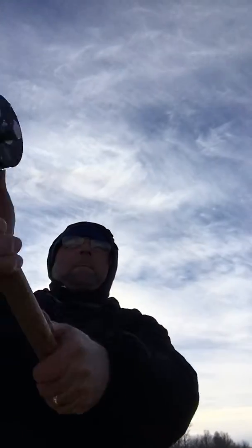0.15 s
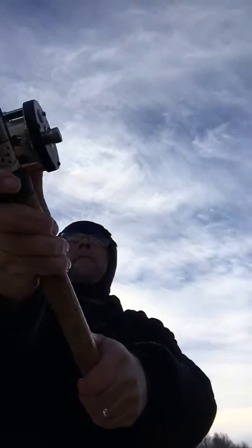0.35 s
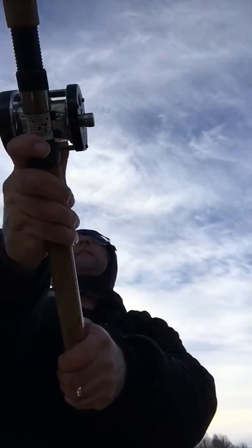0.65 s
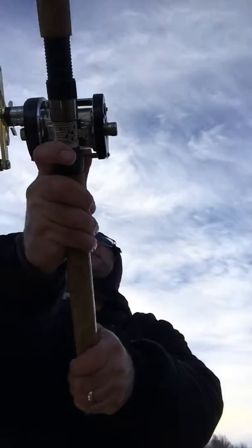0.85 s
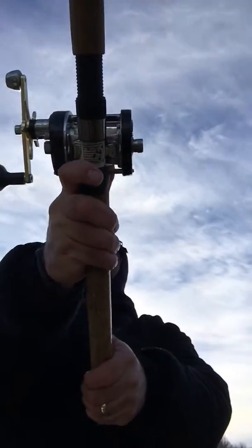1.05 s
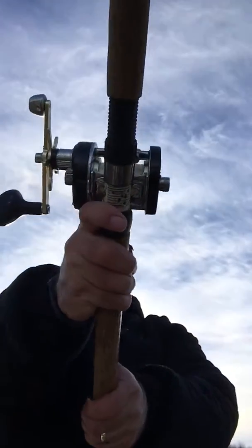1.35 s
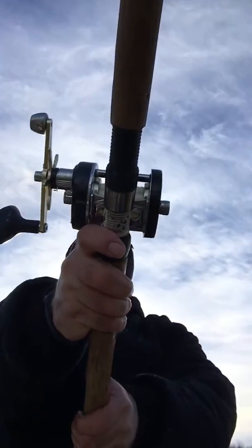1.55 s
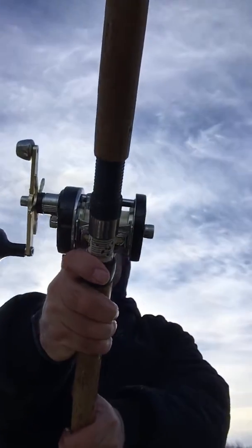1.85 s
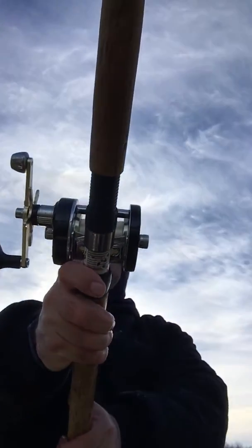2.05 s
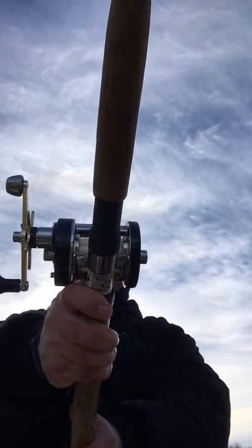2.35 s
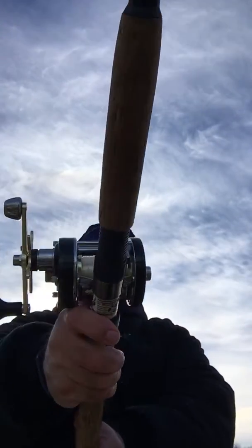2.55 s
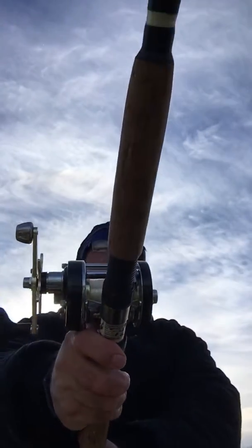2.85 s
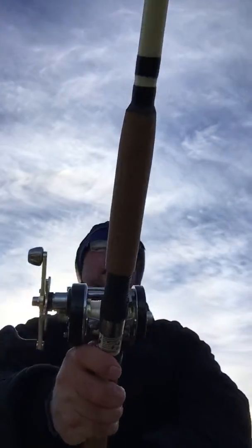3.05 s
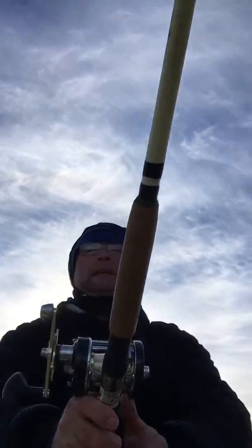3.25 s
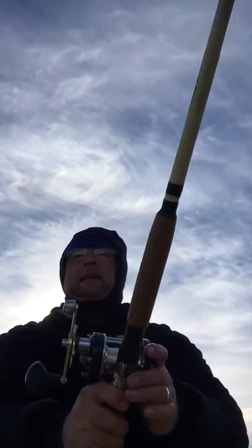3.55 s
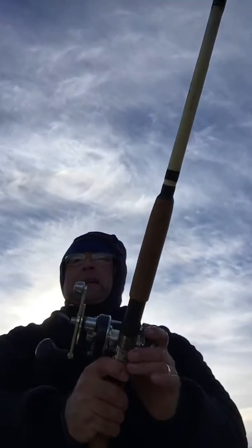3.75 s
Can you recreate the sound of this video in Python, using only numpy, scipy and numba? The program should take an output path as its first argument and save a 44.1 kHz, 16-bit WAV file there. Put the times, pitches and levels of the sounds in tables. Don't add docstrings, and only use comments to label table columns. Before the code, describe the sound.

A casting reel's spinning spool gives a falling metallic whirr until a thumb brakes it dead.

```python
import sys
import numpy as np
from scipy import signal
from scipy.io import wavfile
from scipy.ndimage import uniform_filter1d
from numba import njit

SR = 44100
rng = np.random.default_rng(int(sys.argv[2]) if len(sys.argv) > 2 else 0)


def gain_from_db(level_db):
    decades = np.asarray(level_db, float) / 20
    return 10 ** decades


def digitize_waveform(pressure):
    field = np.atleast_2d(pressure).T
    bounded = np.clip(field, -1, 1)
    quanta = np.round(bounded * 32767).astype(np.int16)
    wavfile.write(sys.argv[1], SR, quanta)


N = 171990
T = np.arange(N) / SR

# time_s, turning_rate_per_s
SPOOL_SPEED = [(0, 112), (.05, 134), (.1, 150), (.225, 125.5), (.31, 138.5), (.42, 119.5), (.485, 126.5),
               (.61, 114), (.655, 117.5), (.71, 114), (.9, 107), (1.05, 94.6), (1.2, 84), (1.45, 71.5),
               (1.7, 62.3), (1.87, 60.2), (2.05, 55.3), (2.6, 45)]
# time_s, level_db, plate_ring_hz, open_side_facing_db
REEL_AS_HEARD = [(0.0, -44, 4250, -34), (0.04, -41, 4350, -18), (0.07, -37, 4330, -12),
                 (0.22, -36, 4180, -15.5), (0.75, -40.5, 4187, -15.5), (1.08, -42, 4230, -13.5),
                 (1.24, -42.5, 4360, -17), (1.61, -44, 4400, -30), (2.03, -46, 4400, -17),
                 (2.04, -44.5, 4370, -31), (2.51, -47.5, 4430, -32), (2.54, -47, 4490, -13),
                 (2.57, -47, 4280, -17), (2.65, -84, 4120, -17), (2.68, -67, 4230, -24),
                 (2.7, -75, 4000, -23)]
# multiple_of_turning_rate, level_db
ORDER_TONES = [(6, -20), (7, -21), (13, -13.5), (14, -21), (15, -23), (16, -16), (17, -18), (19, -21),
               (21, -22), (24, -19), (26, -16), (27, -20), (30, -22), (32, -24), (35, -21), (37, -21),
               (38, -23), (39, -21), (40, -23), (42, -22), (43, -20)]
BALL_TONES_DB = [-19, -11, -20, -19]
# multiple_of_turning_rate, level_db, centre_s, half_length_s
CHATTER = [
    (34, -5.5, .285, .14),
    (34, -11, .49, .065),
    (33, -13, .21, .05),
    (31, -9, .315, .045),
    (38, -11, .42, .05),
    (38, -11, .65, .05),
    (29, -13, .11, .04),
    (35, -12, .39, .04),
]
# pitch_hz, width_hz, level_db, slope_db_per_octave_of_speed
FRAME_MODES = [(1255, 450, 2.6, -2), (1710, 374, -2, 1.5), (2117, 434, -1, 3), (2647, 216, -3.5, -3.5),
               (3176, 102, 1, -1.5), (5190, 240, -25, 21.5), (6064, 114, -6.5, 1.5), (7070, 160, -11.5, 8),
               (9200, 770, -21.5, 6), (12300, 700, -31, 0), (8100, 110, -20, 2), (11200, 1100, -25.5, 3)]
# start_s, peak_db
SNAGS = [(0.0498, -50), (0.0922, -41), (0.404, -42), (0.6979, -42), (0.844, -45), (0.8645, -41),
         (0.9458, -52), (1.063, -58), (1.1448, -54), (1.1927, -45), (1.2451, -53), (1.3324, -46),
         (1.3983, -43), (1.4836, -52), (1.5544, -56), (1.5784, -59), (1.6088, -70), (1.8014, -57),
         (1.8532, -43), (1.9804, -66), (2.0757, -60), (2.1531, -59), (2.3511, -47), (2.4249, -59),
         (2.533, -59), (2.5935, -48)]
# centre_s, pitch_hz, length_s, glide_octaves
KNOCKS = [(.03, 1270, .035, 0), (.255, 1290, .03, -.1), (.25, 255, .05, 0), (.363, 375, .03, -.1),
          (.387, 335, .04, 0), (.42, 400, .04, .1), (.4825, 155, .045, -.4), (.4825, 310, .045, -.4),
          (.52, 600, .035, 0), (.535, 880, .05, 0), (1.12, 95, .05, 0), (2.598, 320, .02, -.2),
          (2.6, 680, .02, 0), (2.63, 280, .03, 0), (2.65, 130, .04, 0), (2.678, 650, .018, 0),
          (2.7, 330, .03, 0), (2.718, 220, .04, -.1), (2.716, 900, .01, 0), (2.84, 200, .13, .9),
          (2.912, 800, .008, 0), (2.936, 1050, .012, 0), (3.16, 1050, .02, 0), (3.295, 550, .022, 0),
          (3.335, 350, .02, 0), (3.345, 180, .03, 0), (3.35, 1000, .012, 0), (3.39, 330, .03, 0),
          (2.73, 105, .12, 0), (3.11, 215, .05, 0)]
KNOCK_LEVELS_DB = [-42.5, -45, -54.5, -49, -47, -53, -47.5, -51, -51, -53, -63.5, -46, -50, -60, -60, -56,
                   -55, -46, -55, -68, -60, -62, -62, -58, -62, -62, -59, -62, -64, -65]
RUSTLE_TIMES_S = [.02, .5, 2.62, 2.71, 2.94, 3.05, 3.2, 3.34, 3.44, 3.58, 3.78]
# level_db, length_s
RUSTLE_SWELLS = [(-52, 0.047), (-53.5, 0.3), (-59.5, 0.063), (-73, 0.15), (-69.5, 0.15), (-67.5, 0.12),
                 (-69, 0.18), (-67, 0.11), (-66.5, 0.18), (-72, 0.15), (-70.5, 0.29)]
# pitch_hz, level_db_per_hz
CLOTH_SPECTRUM = [(150, -32), (250, -9), (357, -1), (434, -10.5), (640, -16), (1110, -9.5), (2190, -10.5),
                  (12000, -36.5), (15600, -60), (22000, -120)]
# pitch_hz, level_db
AIR_SPECTRUM = [(71, 0), (120, 1.5), (183, -8.5), (384, -3.5), (469, 3), (807, -5), (967, -2), (2030, -8),
                (14500, -29)]
# start_s, level_db
GUST_TICKS = [
    (3.768, -62),
    (3.785, -72),
    (3.842, -60),
]
# centre_s, pitch_hz, width_hz, level_db, length_s
SQUEAKS = [
    (2.54, 6500, 3000, -64, .03),
    (2.555, 12100, 250, -75, .02),
    (2.63, 8700, 400, -78, .05),
    (2.63, 6500, 1200, -76, .06),
]
# start_s, level_db
TAPS = [(2.594, -42), (2.6, -42), (2.607, -44), (2.672, -48), (2.683, -43), (2.714, -41.5), (2.722, -52),
        (2.909, -52), (2.936, -53), (2.956, -57), (3.18, -68), (3.333, -58), (3.349, -56), (3.392, -67),
        (3.498, -69)]

SPEED_JITTER, WOBBLE, FLUTTER_DB = .004, 0.22, 0.59
GRAINS_PER_S, GRAIN_SPREAD_DB = 11000, 3.5
BALLS_PER_TURN, TONES_DB, TONE_WANDER_DB, FINE_ORDERS_DB = 5.44, -5, 3.5, -24
TONE_CUT_HZ = 950
BALLS_LOADED_S, BALL_SURGE_S, BALL_SURGE_LEN_S, BALL_SURGE_DB = .36, .43, .06, 6
REBOUND_S, REBOUND_LEN_S, IMBALANCE_DB, STOP_S = .31, .17, -33, 2.66
PLATE_WIDTH_HZ, PLATE_DB, PLATE_DB_PER_OCTAVE = 230, 3.5, -3.5
BETWEEN_HZ, BETWEEN_DB, BETWEEN_DB_PER_OCTAVE = 3450, -9.5, -4.5
ABOVE_DB, ABOVE_DB_PER_OCTAVE = -17.5, 3
SPRAY_DB, SPRAY_HZ, SPRAY_DB_PER_OCTAVE = -33.5, 10000, 6
LOW_CUT_HZ, UNDERTONE_DB, UNDERTONE_DB_PER_OCTAVE = 1088, -23.5, 4
GRIP_HZ, GRIP_WIDTH_HZ, GRIP_DB = 336, 150, -26
THUMB_S, THUMB_LEN_S, THUMB_DB = 2.44, 0.42, 20
AIR_DB, AIR_TOP_HZ = -70.5, 14900
WIND_DB, WIND_HZ = -73.5, 91
GUST_S, GUST_DB, GUST_HZ, FIZZ_DB, FIZZ_HZ = 3.765, -64, 150, -79, 10800
SCUFF_DB, SCUFF_HZ = -13, 1290
SNAG_LOSS_DB, SNAG_S = -6, .0012
TAP_HZ, TAP_WIDTH_HZ = 800, 620
PORT_DIP_HZ, PORT_DIP_WIDTH_HZ, PORT_DIP = 10560, 1700, 0.37


def rms_one(x):
    return x / np.sqrt(np.mean(x ** 2) + 1e-20)


def in_time(rows):
    s, *columns = np.transpose(rows)
    return [np.interp(T, s, c) for c in columns]


def drift(rate_hz):
    r = np.exp(-80 * np.pi * rate_hz / SR)
    noise = rng.standard_normal(N // 40 + 2002)
    slow = signal.lfilter([1], [1, -2 * r, r * r], noise)[2000:]
    return np.interp(np.arange(N) / 40, np.arange(len(slow)), rms_one(slow))


def cut(x, hz, kind, order=2):
    return signal.sosfilt(signal.butter(order, hz, kind, fs=SR, output="sos"), x)


def bell(centre_s, length_s):
    return np.exp(-4 * ((T - centre_s) / length_s) ** 2)


def plateau(centre_s, half_s):
    return np.exp(-((T - centre_s) / half_s) ** 4)


@njit
def resonance(x, hz, width_hz):
    y, r = np.zeros(len(x)), np.exp(-np.pi * width_hz / SR)
    for i in range(2, len(x)):
        drive = (1 - r * r) / 2 * (x[i] - x[i - 2])
        y[i] = drive + 2 * r * np.cos(2 * np.pi * hz[i] / SR) * y[i - 1] - r * r * y[i - 2]
    return y


def steady_resonance(x, hz, width_hz):
    return resonance(x, np.full(N, float(hz)), float(width_hz))


def twice(x, hz, width_hz):
    wide = 1.5 * width_hz
    return resonance(resonance(x, hz, wide), hz, wide)


def grains(per_s, spread_db):
    size = gain_from_db(spread_db * np.minimum(rng.exponential(1, N), 4.2)) * rng.choice([-1, 1], N)
    return rms_one(size * (rng.random(N) < per_s / SR))


def banded(source, spectrum, patchy_db):
    out, edges = 0, 22 * 2 ** np.arange(0, 9.9, .5)
    hz, db = np.transpose(spectrum)
    for k, (low, high) in enumerate(zip(edges, edges[1:])):
        level_db = np.interp(np.log(low * high) / 2, np.log(hz), db)
        band = cut(np.roll(source, 5000 * k), [low, high], "band")
        out = out + gain_from_db(level_db + patchy_db * drift(10)) * band
    return rms_one(out)


def spool_whine(angle):
    tones = ORDER_TONES + [(BALLS_PER_TURN * k, db) for k, db in enumerate(BALL_TONES_DB, 1)]
    tones += [(k, FINE_ORDERS_DB + 2 * rng.standard_normal()) for k in range(45, 95, 2)]
    wander = [gain_from_db(TONE_WANDER_DB * drift(22)) for _ in range(6)]
    loaded = np.clip(1 + 40 * (T - BALLS_LOADED_S - .02), .3, 1)
    loaded = loaded * gain_from_db(BALL_SURGE_DB * plateau(BALL_SURGE_S, BALL_SURGE_LEN_S))
    whine = np.zeros(N)
    for order, db, s, half in CHATTER:
        whine += gain_from_db(db) * plateau(s, half) * np.cos(order * angle)
    for k, (order, db) in enumerate(tones):
        load = loaded if order % 1 else 1
        level = gain_from_db(db + TONES_DB) * load * np.roll(wander[k % 6], 9000 * k)
        whine += level * np.cos(order * angle + rng.uniform(0, 6.7))
    return cut(whine, TONE_CUT_HZ, "high", order=6)


def frame_ring(rub, hiss, whine, octaves, plate_hz, facing_db):
    drive = rub + whine
    plate_db = PLATE_DB + PLATE_DB_PER_OCTAVE * octaves + 0.7 * drift(6)
    body = gain_from_db(plate_db) * twice(drive, plate_hz, PLATE_WIDTH_HZ)
    between = cut(hiss, BETWEEN_HZ, "low", order=6) + cut(whine, 1.27 * BETWEEN_HZ, "low")
    body += gain_from_db(BETWEEN_DB + BETWEEN_DB_PER_OCTAVE * octaves) * between
    above = cut(hiss, [4000, 7500], "band", order=3)
    body += gain_from_db(ABOVE_DB + ABOVE_DB_PER_OCTAVE * octaves) * above
    body += gain_from_db(SPRAY_DB + SPRAY_DB_PER_OCTAVE * octaves) * cut(hiss, SPRAY_HZ, "high")
    for hz, width_hz, db, slope_db in FRAME_MODES:
        tipped, facing = np.ones(N), 0
        if 5500 < hz < 6500:
            tipped, facing = plate_hz / 4300, facing_db + 18
        wander_db = (1.0 if hz < 7500 else 2.5) * drift(3.2)
        level_db = db + slope_db * octaves + facing + wander_db
        body += gain_from_db(level_db) * twice(drive, hz * tipped, float(width_hz))
    return cut(body, LOW_CUT_HZ, "high", order=4)


def grip_undertone(drive, hiss, octaves, angle):
    low = gain_from_db(UNDERTONE_DB + UNDERTONE_DB_PER_OCTAVE * octaves) * cut(hiss, [200, LOW_CUT_HZ], "band")
    thumb_db = THUMB_DB * plateau(THUMB_S, THUMB_LEN_S)
    low += gain_from_db(GRIP_DB + thumb_db) * twice(drive, np.full(N, float(GRIP_HZ)), GRIP_WIDTH_HZ)
    low += gain_from_db(IMBALANCE_DB) * plateau(REBOUND_S, REBOUND_LEN_S) * np.cos(angle)
    return low


def reel():
    speed, = in_time(SPOOL_SPEED)
    level_db, plate_hz, facing_db = in_time(REEL_AS_HEARD)
    speed = uniform_filter1d(speed, size=SR // 40) * (1 + SPEED_JITTER * drift(15))
    angle, octaves = 2 * np.pi * np.cumsum(speed) / SR, np.log2(speed / 80)
    throb = 1 + WOBBLE * np.cos(angle) + WOBBLE * np.cos(2 * angle + 1)
    rub = throb * grains(GRAINS_PER_S, GRAIN_SPREAD_DB)
    hiss = throb * grains(GRAINS_PER_S, GRAIN_SPREAD_DB)
    whine = spool_whine(angle)
    body = frame_ring(rub, hiss, whine, octaves, plate_hz, facing_db)
    low = grip_undertone(rub + whine, hiss, octaves, angle)
    power = uniform_filter1d(body ** 2, size=SR // 3)
    stop = np.clip(20 * (STOP_S - T), 0, 1) ** .5
    return stop * gain_from_db(level_db + FLUTTER_DB * drift(55)) * (body + low) / np.sqrt(power)


def open_air():
    air = banded(rng.standard_normal(N), AIR_SPECTRUM, patchy_db=3.5)
    return gain_from_db(AIR_DB) * cut(air, AIR_TOP_HZ, "low", order=12)


def wind():
    calm = rms_one(cut(rng.standard_normal(N), [35, WIND_HZ], "band"))
    calm = gain_from_db(WIND_DB + 2 * drift(0.66)) * calm
    gust = rms_one(cut(rng.standard_normal(N), [50, GUST_HZ], "band"))
    gust = gain_from_db(GUST_DB + 1.4 * drift(28)) * gust
    fizz = gain_from_db(FIZZ_DB) * rms_one(cut(grains(1500, 1.8), FIZZ_HZ, "high", order=4))
    on = np.clip((T - GUST_S) / 0.0033, 0, 1)
    clicks = np.zeros(N)
    for s, db in GUST_TICKS:
        i = int(s * SR)
        clicks[i:i + 200] = gain_from_db(db) * np.exp(-np.arange(200) / 60) * rng.standard_normal(200)
    return calm + on * (gust + fizz) + cut(clicks, 6000, "high")


def jacket():
    swell = np.zeros(N)
    for s, (db, length) in zip(RUSTLE_TIMES_S, RUSTLE_SWELLS):
        swell += gain_from_db(db) * bell(s, length)
    return swell * banded(grains(8000, 4.45), CLOTH_SPECTRUM, patchy_db=1.5)


def knocks():
    out, rough = np.zeros(N), 1 + 0.12 * drift(83)
    grit = gain_from_db(SCUFF_DB) * rms_one(cut(grains(3700, 0.83), [150, SCUFF_HZ], "band", order=3))
    for (s, hz, length, glide), db in zip(KNOCKS, KNOCK_LEVELS_DB):
        near = np.abs(T - s) < 1.5 * length
        u = (T[near] - s) / length
        bend = np.cos(2 * np.pi * hz * length * u * (1 + .35 * glide * u))
        out[near] += gain_from_db(db) * np.exp(-5 * u * u) * (rough[near] * bend + grit[near])
    return out


def snags():
    out, t = np.zeros(N + 300), np.arange(300) / SR
    for s, db in SNAGS:
        i = int(s * SR)
        out[i:i + 300] = gain_from_db(db + SNAG_LOSS_DB) * np.exp(-t / SNAG_S) * rng.standard_normal(300)
    return cut(out[:N], [6500, 11500], "band")


def squeaks():
    out, noise = np.zeros(N), rng.standard_normal(N)
    for s, hz, width_hz, db, length in SQUEAKS:
        out += gain_from_db(db) * bell(s, length) * rms_one(steady_resonance(noise, hz, width_hz))
    return out


def taps():
    clicks = np.full(N, 1e-18)
    for s, db in TAPS:
        clicks[int(s * SR)] = -gain_from_db(db) * SR / (np.pi * TAP_WIDTH_HZ)
    return steady_resonance(cut(clicks, 1800, "low"), TAP_HZ, TAP_WIDTH_HZ)


def scene():
    machine = reel() + snags() + squeaks()
    hands = knocks() + taps() + jacket()
    return (machine + hands + wind() + open_air())[None]


def roll_off(x):
    return signal.sosfilt(signal.butter(12, 15730, fs=SR, output="sos"), x)


def record(dry):
    dipped = dry - PORT_DIP * steady_resonance(dry[0], PORT_DIP_HZ, PORT_DIP_WIDTH_HZ)
    return roll_off(dipped)


dry = scene()
out = record(dry)
digitize_waveform(out)
```